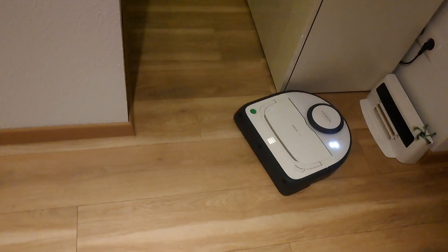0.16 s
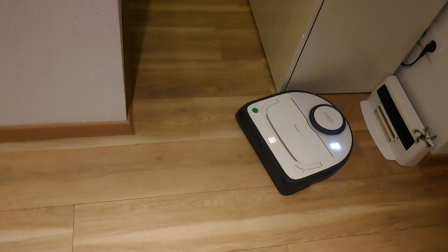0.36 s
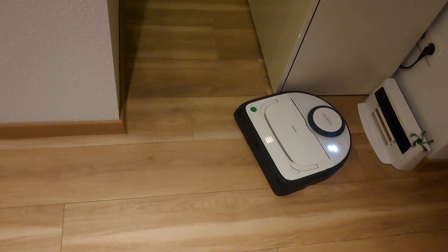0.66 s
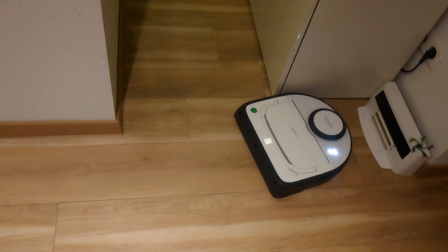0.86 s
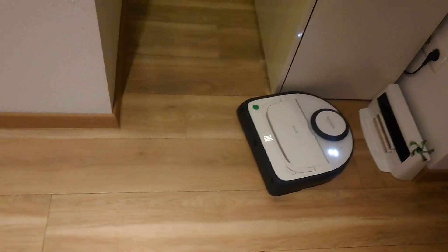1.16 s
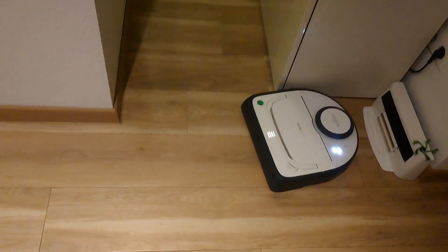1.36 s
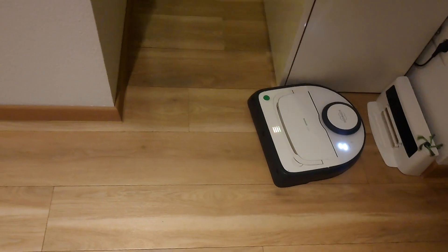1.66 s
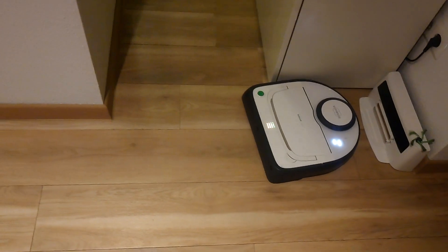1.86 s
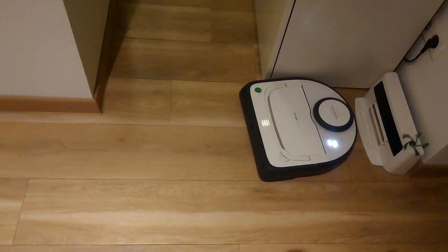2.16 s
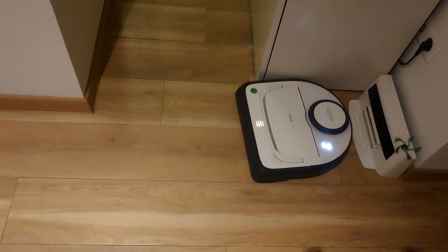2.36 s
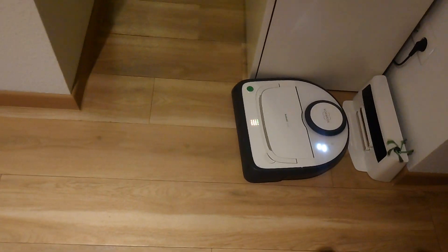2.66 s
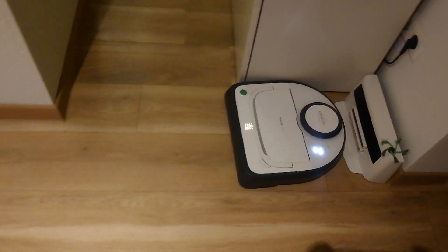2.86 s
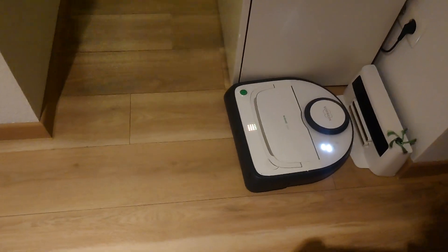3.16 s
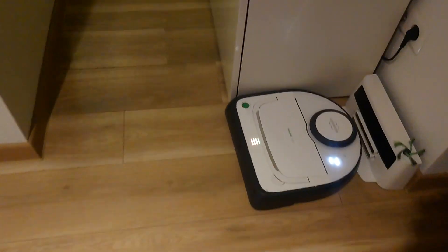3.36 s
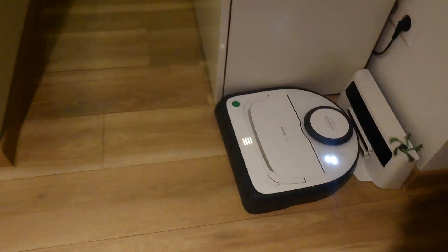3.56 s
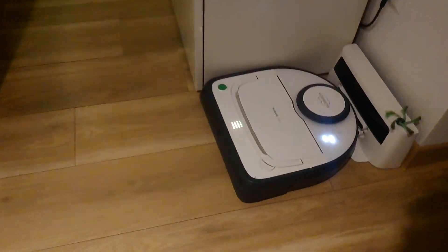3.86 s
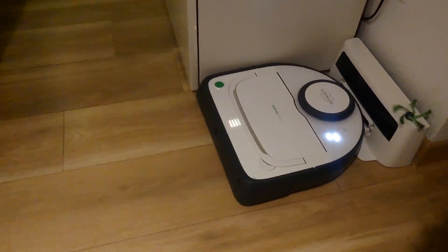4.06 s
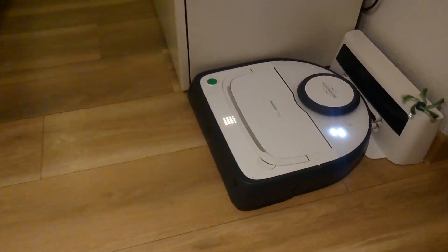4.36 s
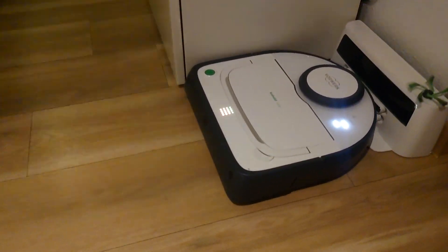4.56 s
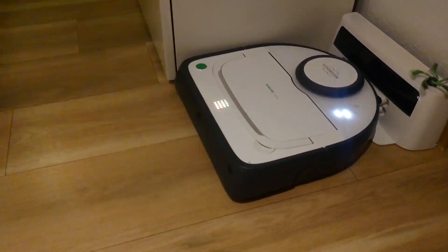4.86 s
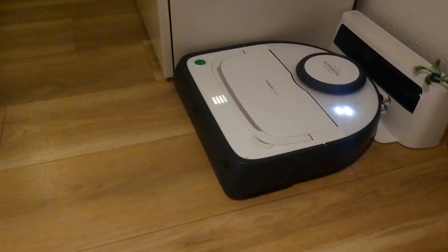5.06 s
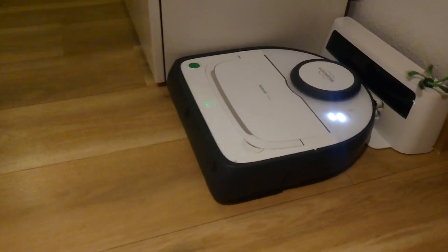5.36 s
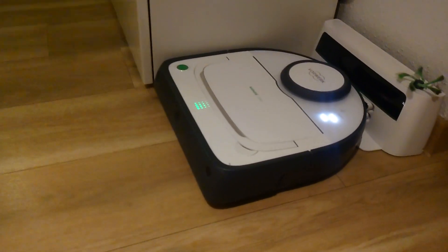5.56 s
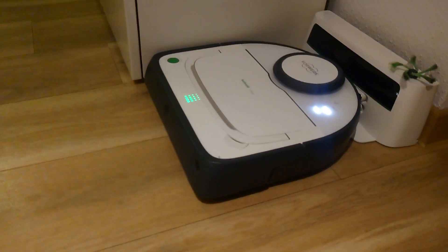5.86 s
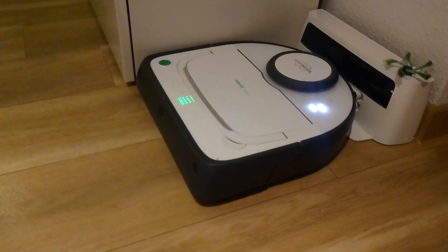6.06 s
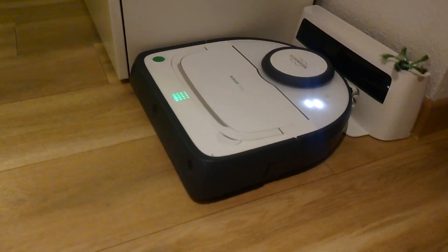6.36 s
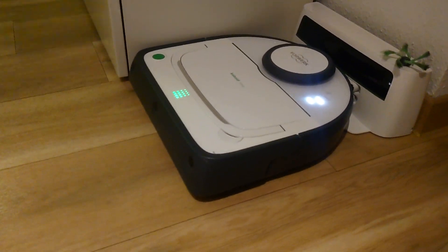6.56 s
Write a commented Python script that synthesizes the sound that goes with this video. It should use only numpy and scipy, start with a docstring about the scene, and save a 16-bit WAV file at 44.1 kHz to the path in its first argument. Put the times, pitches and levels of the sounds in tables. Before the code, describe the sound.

A robot vacuum hums steadily with a mid-pitched motor tone and airy brush whirr, then plastic clacks rattle as it settles against its dock.

```python
"""A robot vacuum cleaner backs onto its dock on a wooden floor as a hand-held two-port microphone comes closer.
From the start a small motor sings on multiples of its shaft speed (sines) over a brush whirr (shaped noise),
slower motors hum below, and cloth rustles; from about 1.1 s there are soft thuds and bright ticks.
Near 3 s the loudest tone sinks in a null; then whine and floor drone come up as the microphone nears.
From 3.9 s the dock contacts clack on ringing plastic modes, thickest between 5.4 and 6 s, with a room tail."""
import sys
import numpy as np
from scipy import signal
from scipy.fft import rfft, irfft
from scipy.io import wavfile
from scipy.ndimage import map_coordinates

SR = 44100
rng = np.random.default_rng(int(sys.argv[2]) if len(sys.argv) > 2 else 0)


def to_wav(sig):
    """Store sig (one row per channel, or 1-D mono) as 16-bit WAV at the path in sys.argv[1].

    Samples outside -1..1 are clipped; the rate is SR.
    """
    pcm = np.clip(np.atleast_2d(sig), -1, 1) * 32767
    pcm = np.round(pcm).astype(np.int16)
    wavfile.write(sys.argv[1], SR, pcm.T)  # frames by channels


N = 296333
TIME = np.arange(N) / SR
FREQ = np.fft.rfftfreq(N, 1 / SR) + 1   # shifted up 1 Hz so that its logarithm exists


def amp(db):
    """Decibels to gain."""
    return 10 ** (np.asarray(db) / 20)


def rms_one(x):
    """Scale to rms 1."""
    return x / np.sqrt(np.mean(x ** 2) + 1e-20)


def in_time(rows):
    """Columns of a table, joined by straight lines in time."""
    s, *columns = np.transpose(rows)
    return [np.interp(TIME, s, column) for column in columns]


def at_hz(points):
    """A spectrum in dB, or another value per frequency, joined on a log-frequency axis."""
    hz, value = np.transpose(points)
    return np.interp(np.log(FREQ), np.log(hz), value)


def drift(rate_hz):
    """Slow chance of spread 1: coarse noise through a double one-pole low-pass."""
    step = 64   # one coarse value every 64 samples
    r = np.exp(-2 * np.pi * rate_hz * step / SR)
    noise = rng.standard_normal(N // step + 2002)
    slow = signal.lfilter([1], [1, -2 * r, r * r], noise)[2000:]   # drop the filter's start
    return np.interp(np.arange(N) / step, np.arange(len(slow)), rms_one(slow))


def tone(turns, left_db, right_db, lead):
    """A sine at both ports, given in rms dB, the left leading by an angle in radians."""
    start = rng.uniform(0, 2 * np.pi)
    phase = 2 * np.pi * turns + start
    left = amp(left_db) * np.sin(phase + lead / 2)
    right = amp(right_db) * np.sin(phase - lead / 2)
    return np.sqrt(2) * np.array([left, right])


def band_filter(x, order, hz, kind):
    """Butterworth filter that keeps the highs or a band."""
    return signal.sosfilt(signal.butter(order, hz, kind, fs=SR, output="sos"), x)


# Resonances of the shell. Each row: pitch in Hz, width in Hz, boost or cut in dB.
SHELL_RESONANCES = [(515, 156, -5), (1966, 30, -2), (3335, 170, 4.5), (4063, 270, -7), (6000, 270, 2.5),
                    (8400, 340, 4), (9250, 100, 4.5), (10100, 340, 3.5), (11900, 700, -1.5),
                    (13600, 430, -5.5), (16100, 230, -7)]
# How alike the noise is left and right. Each row: frequency in Hz, likeness from 0 to 1.
PORT_LIKENESS = [(60, 0.34), (130, 0.8), (290, 0.63), (640, 0.93), (1410, 0.041), (3100, 0.12),
                 (6820, 0.027), (15000, 0.005)]


def air(spectrum, source=None):
    """Stereo noise with a spectrum, the shell resonances and the ports' likeness; rms 1."""
    peaks_db = sum(db / (1 + ((FREQ - hz) / (width / 2)) ** 2) for hz, width, db in SHELL_RESONANCES)
    if source is None:
        source = rng.standard_normal((2, N))
    mid, side = rfft(source) * amp(at_hz(spectrum) + peaks_db)
    alike = np.clip(at_hz(PORT_LIKENESS), 0, 1)
    # the shared part is equal at both ports, the other part is opposite
    return rms_one(irfft(np.sqrt(1 + alike) * mid + np.sqrt(1 - alike) * side * [[1], [-1]], N))


def scraping(turns, share, memory_turns):
    """Motor brushes meet the same slowly renewed roughness every turn, so multiples show faint lines."""
    steps = 512   # roughness values per turn
    keep = np.exp(-1 / memory_turns)
    fresh = rng.standard_normal((2, int(turns[-1]) + 101, steps))
    pattern = signal.lfilter([1], [1, -keep], fresh, axis=1)[:, 100:].reshape(2, -1)
    repeating = rms_one(pattern[:, (turns * steps).astype(int)])
    return np.sqrt(share) * repeating + np.sqrt(1 - share) * rng.standard_normal((2, N))


def patchy(x, depth_db, band_hz, hold_s):
    """Narrow bands swell and fade on their own as the microphone moves through the sound field."""
    hz, s, cells = signal.stft(x, SR, nperseg=1024)
    chance = rng.standard_normal((2, int(hz[-1] / band_hz) + 2, int(s[-1] / hold_s) + 2))
    grid = np.meshgrid(hz / band_hz, s / hold_s, indexing="ij")
    gain = amp(depth_db * np.array([map_coordinates(c, grid, order=1) for c in chance]))
    return rms_one(signal.istft(cells * gain, SR, nperseg=1024)[1][:, :N])


# Shaft speed. Each row: time in seconds, turns per second.
SHAFT_SPEED = [(0.0, 95.38), (0.7, 95.41), (1.0, 95.21), (2.25, 95.09), (2.75, 95.26), (3.0, 95.46),
               (3.35, 95.36), (4.3, 95.56), (5.05, 95.95), (5.4, 95.8), (5.9, 95.43), (6.72, 95.57)]


def shaft_turns():
    """Turns made by the shaft so far; its angle flutters a little."""
    return np.cumsum(in_time(SHAFT_SPEED)[0]) / SR + .0015 * drift(5.3)


# Motor whine, which grows as the microphone nears. Each row: time in seconds, level in dB.
WHINE_LEVEL = [(0, -71.5), (2.5, -73.5), (3.5, -64), (4.3, -67), (4.8, -56.5), (5.4, -54.5), (6.0, -55.5),
               (6.72, -58)]
FAR_DB = -68   # the whine level at which the other growing sounds have their base levels


def nearness():
    """How many dB the whine stands above its far level."""
    return in_time(WHINE_LEVEL)[0] - FAR_DB


# The loudest multiple, the fifth; the microphone crosses a null of its standing wave.
# Each row: time in seconds, level in dB, left minus right in dB, left lead in radians.
FIFTH_MULTIPLE = [(0.0, -43, -5.5, -0.69), (0.45, -43, -5.5, -0.57), (2.0, -44.5, -4, -0.72),
                  (2.47, -49.5, 1.5, -0.53), (2.82, -54.5, -0.5, -1.1), (2.99, -57, -8, -1),
                  (3.18, -56, -10.5, -0.4), (3.54, -45.5, -5.5, 0.2), (3.99, -42.5, -3.5, -0.32),
                  (4.94, -39, -5.5, -0.4), (5.54, -39.5, -4.5, -0.26), (5.69, -38.5, -5, -0.17),
                  (6.72, -38.5, -5, -0.29)]
# Strong multiples of the shaft speed.
STRONG_MULTIPLES = [10, 12, 15, 21, 22]
# They swell and sink as the microphone crosses their standing waves.
# Each row: time in seconds, then the level of each strong multiple in dB, at the left and right port.
STRONG_LEFT_DB = [(0.0, -64, -71, -76.0, -68, -74.0), (0.28, -64, -80.0, -66.0, -67, -80),
                  (0.56, -63, -89, -63.0, -66, -65), (0.84, -76, -75, -73.0, -62, -60),
                  (1.12, -78, -65, -64, -69, -63.0), (1.4, -69, -77.0, -61, -61, -79),
                  (1.68, -71.0, -72.0, -61, -74, -59), (1.96, -74.0, -72.0, -63, -61, -60),
                  (2.24, -70, -67.0, -75, -68, -62.5), (2.52, -70.0, -64, -67, -78, -66),
                  (2.8, -70.0, -64, -69, -80, -73.0), (3.08, -66, -69, -72, -70, -58),
                  (3.36, -71.0, -79, -71, -63, -67), (3.64, -65, -57, -67.0, -63, -60),
                  (3.92, -58.5, -75, -66, -61.0, -60), (4.2, -67, -64, -64, -64.0, -66.0),
                  (4.48, -82, -65, -57, -70, -66), (4.76, -71.0, -70, -67, -60, -71),
                  (5.04, -90.0, -74, -60, -78, -71), (5.32, -82, -70, -59.0, -63.0, -75.0),
                  (5.6, -64, -69, -61, -56, -60), (5.88, -66, -79, -62, -60, -64),
                  (6.16, -68, -62, -67.0, -60, -56), (6.44, -63, -67, -68, -62, -58.5),
                  (6.72, -66.0, -66, -67.0, -66, -55)]
STRONG_RIGHT_DB = [(0.0, -75.0, -60.0, -66.0, -66.0, -63.0), (0.28, -85.0, -60.0, -70.0, -68.0, -66.0),
                   (0.56, -80.0, -60.0, -65.0, -69.0, -67.0), (0.84, -75.0, -61.0, -64.0, -63.0, -58.0),
                   (1.12, -83.0, -63.0, -67.0, -64.0, -58.0), (1.4, -74.0, -65.0, -65.0, -61.0, -61.0),
                   (1.68, -72.0, -62.0, -65.0, -63.0, -62.0), (1.96, -65.0, -64.0, -65.0, -59.0, -62.0),
                   (2.24, -66.0, -66.0, -73.0, -62.0, -65.0), (2.52, -72.0, -71.0, -67.0, -60.0, -65.0),
                   (2.8, -71.0, -64.0, -61.0, -61.0, -65.0), (3.08, -69.0, -67.0, -61.0, -62.0, -70.0),
                   (3.36, -64.0, -68.0, -62.0, -67.0, -62.0), (3.64, -66.0, -64.0, -68.0, -63.0, -61.0),
                   (3.92, -63.0, -65.0, -60.0, -62.0, -63.0), (4.2, -68.0, -65.0, -62.0, -62.0, -66.0),
                   (4.48, -77.0, -68.0, -62.0, -61.0, -65.0), (4.76, -80.0, -74.0, -65.0, -64.0, -61.0),
                   (5.04, -74.0, -72.0, -61.0, -67.0, -65.0), (5.32, -81.0, -74.0, -61.0, -67.0, -65.0),
                   (5.6, -76.0, -76.0, -66.0, -58.0, -56.0), (5.88, -74.0, -71.0, -65.0, -62.0, -57.0),
                   (6.16, -70.0, -70.0, -65.0, -66.0, -56.0), (6.44, -75.0, -77.0, -69.0, -75.0, -61.0),
                   (6.72, -73.0, -92.0, -67.0, -70.0, -59.0)]
# Each row: time in seconds, then the left lead of each strong multiple in radians.
STRONG_LEFT_LEAD = [(0.0, 0.2, 0.1, 0.0, -0.0, -0.1), (0.28, 1.2, 2.0, 1.6, 0.9, -2.6),
                    (0.56, 3.7, 3.6, 1.5, 1.2, -1.5), (0.84, 2.4, 3.5, 1.6, 0.6, -0.6),
                    (1.12, 4.7, 3.7, -0.5, -0.2, -1.0), (1.4, 4.7, 3.6, -2.7, -0.5, -0.6),
                    (1.68, 4.4, 3.6, -2.7, -0.8, -0.5), (1.96, 5.2, 3.7, -3.3, -0.1, -0.1),
                    (2.24, 5.9, 3.9, -4.3, -1.1, 0.3), (2.52, 6.2, 4.1, -1.5, -1.0, 0.4),
                    (2.8, 6.2, 4.1, -0.2, -1.4, 1.7), (3.08, 5.8, 4.9, 0.8, -0.2, -0.6),
                    (3.36, 6.3, 6.3, 0.1, -0.5, 0.1), (3.64, 6.5, 6.2, -2.8, -0.2, 1.2),
                    (3.92, 6.2, 5.9, -4.2, 0.3, 0.9), (4.2, 6.1, 7.3, -4.3, -0.1, 0.4),
                    (4.48, 6.4, 7.8, -4.3, 0.6, 0.4), (4.76, 5.1, 8.7, -5.4, 0.5, 2.0),
                    (5.04, 4.9, 6.7, -4.7, 0.6, 1.5), (5.32, 6.0, 6.9, -4.6, 0.9, 1.5),
                    (5.6, 6.3, 6.9, -4.4, 0.3, 1.7), (5.88, 6.9, 6.8, -4.1, -0.0, 2.3),
                    (6.16, 6.7, 5.8, -3.6, 0.0, 2.6), (6.44, 6.3, 5.4, -3.6, -0.4, 1.8),
                    (6.72, 6.1, 4.7, -3.5, -0.8, 2.4)]
# Multiples inside the whine band.
WHINING_MULTIPLES = [35, 39, 42, 44]
# Each row: time in seconds, then the level of each whining multiple in dB.
WHINING_DB = [(0.0, -69, -69, -74, -74), (0.28, -71, -72, -83, -70.0), (0.56, -70, -88, -68.5, -72.0),
              (0.84, -69, -74, -71, -68), (1.12, -78.0, -73, -73, -67), (1.4, -82, -81, -66.5, -74),
              (1.68, -79, -75.0, -77, -66), (1.96, -74.0, -67, -70, -69), (2.24, -73, -79, -66, -69),
              (2.52, -75.0, -61, -70, -63), (2.8, -86.0, -73.0, -63.5, -79), (3.08, -71, -71, -63, -77),
              (3.36, -74, -67, -69.0, -67), (3.64, -84, -64, -67.0, -70), (3.92, -76, -75, -68, -72),
              (4.2, -68, -73.0, -71, -70), (4.48, -75, -70, -67, -68), (4.76, -68, -64, -68, -70),
              (5.04, -63.0, -66, -66, -72.0), (5.32, -63, -65.0, -64, -71), (5.6, -68, -68.0, -71, -76),
              (5.88, -61, -67, -67, -81), (6.16, -62, -70, -68, -73), (6.44, -64.0, -69, -66, -71),
              (6.72, -58, -74, -67, -73)]
# Weak multiples. Each row: multiple of the shaft speed, base level in dB.
WEAK_MULTIPLES = [(1, -82.5), (8, -76.5), (9, -75), (11, -80), (13, -75), (14, -75), (16, -75.5), (17, -75),
                  (19, -74.5), (20, -72), (23, -75), (26, -76.5), (34, -75), (40, -75), (41, -73),
                  (57, -82), (64, -82.5), (66, -84)]
LINES_GROW = 0.26   # dB per dB of the whine


def motor(turns, near_db):
    """Sines locked to the shaft; each multiple fades and shifts on its own."""
    tone_db, pan_db, lead = in_time(FIFTH_MULTIPLE)
    tone_db = tone_db + .5 * drift(17.5)
    out = tone(5 * turns + 0.0037 * drift(25), tone_db + pan_db / 2, tone_db - pan_db / 2, lead)

    strong = zip(STRONG_MULTIPLES, in_time(STRONG_LEFT_DB), in_time(STRONG_RIGHT_DB),
                 in_time(STRONG_LEFT_LEAD))
    for multiple, left_db, right_db, lead in strong:
        waver_db = 2.13 * drift(6.4)
        cycles = multiple * turns + 0.012 * drift(11.0)
        out += tone(cycles, left_db + waver_db, right_db + waver_db, lead)

    for multiple, db in zip(WHINING_MULTIPLES, in_time(WHINING_DB)):
        cycles = multiple * turns + .55 * drift(9.0)
        out += tone(cycles, db + 4.0 * drift(9.0), db + 4.0 * drift(9.0), 1.5 * drift(.8))

    for multiple, db in WEAK_MULTIPLES:
        high = multiple > 30
        # higher lines warble more; the highest come in short patches
        fades_hz = 9 if high else 3.5
        cycles = multiple * turns + .009 * multiple * drift(8.8)
        # the shaft rate and the high multiples grow as the microphone nears
        db = db + LINES_GROW * near_db * (high or multiple == 1)
        left_db, right_db = db + 4.5 * drift(fades_hz), db + 4.5 * drift(fades_hz)
        out += tone(cycles, left_db, right_db, rng.uniform(-3, 3))
    return out


# Slower motors. Each row: time in seconds, left level of the lower tone in dB, of the upper tone in dB.
HUM_LEVELS = [(0.0, -68, -71.5), (1.1, -66, -67), (2.4, -64, -65), (3.55, -64.5, -67.5), (4.25, -66.5, -80),
              (4.85, -66.5, -73), (5.7, -66, -71), (6.72, -70.5, -76)]
HUM_HZ = (242.9, 322.4)
HUM_WAVER_DB = 2.5


def hum():
    """Two low tones of slower motors; their level wavers."""
    low_db, high_db = in_time(HUM_LEVELS) + HUM_WAVER_DB * np.array([drift(7.1), drift(1.0)])
    low = tone(HUM_HZ[0] * TIME, low_db, low_db + 1.5, 0.11)
    high = tone(HUM_HZ[1] * TIME, high_db, high_db + 3.5, 0.17)
    return low + high


# Tone colours of the four noises. Each row: frequency in Hz, relative level in dB.
LOW_WHIRR_SPECTRUM = [(100, -34), (170, -29), (237, -12), (414, -13), (472, -11.5), (507, -14.5),
                      (531, -3.5), (666, -15.5), (1140, -17.5), (1620, -12), (2060, -14.5), (2290, -16.5),
                      (2900, -24.5), (3770, -65), (6380, -120)]
HIGH_WHIRR_SPECTRUM = [(1470, -32), (2500, -20), (2610, -20), (2800, -8), (3230, -1), (3550, -4.5),
                       (4140, 0.5), (5170, -8.5), (6140, -16), (6980, -23), (7200, -20.5), (9360, -22),
                       (15800, -120)]
HISS_SPECTRUM = [(3760, -38), (6400, 1.5), (7020, -19), (7750, 2.5), (8660, -6.5), (9000, 0), (10200, 2),
                 (11800, -1), (13400, 3), (15100, 0), (15700, -5), (16200, -19)]
RUMBLE_SPECTRUM = [(12, -33), (20, -13), (54, -5.5), (87, -14), (114, -9), (210, 2), (228, -36), (240, 3),
                   (310, -51), (530, -120)]
# base levels in dB, then growth in dB per dB of the whine
LOW_DB, HIGH_DB, HISS_DB, RUMBLE_DB = -57.5, -57.5, -67, -71
LOW_GROWS, HIGH_GROWS, HISS_GROWS, RUMBLE_GROWS = 0.011, 0.16, 0.067, 0.027


def whirr(turns, near_db):
    """Low noise and rumble lie under brush noise and hiss that throb once and twice a turn."""
    throb = 1 + 0.1 * np.sin(2 * np.pi * turns) + 0.091 * np.sin(4 * np.pi * turns)
    low = patchy(air(LOW_WHIRR_SPECTRUM), 2.4, 150, 0.33)
    low = amp(LOW_DB + LOW_GROWS * near_db + 1.0 * drift(13.0)) * low

    brushes = scraping(turns, share=0.31, memory_turns=4.5)
    high = patchy(air(HIGH_WHIRR_SPECTRUM, brushes), 2.6, 200, .18)
    high = amp(HIGH_DB + HIGH_GROWS * near_db + 1.2 * drift(12.0)) * throb * high

    brushes = scraping(turns, share=0.59, memory_turns=8.0)
    hiss = patchy(air(HISS_SPECTRUM, brushes), 2.6, 350, .4)
    hiss = amp(HISS_DB + HISS_GROWS * near_db + 1.0 * drift(14)) * throb * hiss

    rumble = amp(RUMBLE_DB + RUMBLE_GROWS * near_db + 2.0 * drift(2.0)) * air(RUMBLE_SPECTRUM)
    return low + high + hiss + rumble


# Tone colour of the whine. Each row: frequency in Hz, relative level in dB.
WHINE_SPECTRUM = [(2700, -21), (3050, -13), (3300, -0.5), (3520, -13), (3750, 3.5), (4050, 6.5),
                  (4300, -40), (5000, -38)]
DRONE_DB, DRONE_GROWS = -80.5, 0.83   # base level, dB per dB of the whine


def close_by(turns, near_db):
    """A narrow band of motor whine and a drone of the floor boards come up as the microphone nears."""
    brushes = scraping(turns, share=0.64, memory_turns=4.0)
    whine = patchy(air(WHINE_SPECTRUM, brushes), 2.5, 180, .07)
    drone = rms_one(band_filter(rng.standard_normal((2, N)), 2, [90, 160], "band"))
    return amp(FAR_DB + near_db) * whine + amp(DRONE_DB + DRONE_GROWS * near_db) * drone


# Narrow airy bands that come and go close to the outlet.
# Each row: start in seconds, end in seconds, pitch in Hz, width in Hz, level in dB.
AIRY_BANDS = [(4.25, 4.6, 13000, 500, -78), (4.9, 6.35, 13350, 300, -77), (5.0, 5.4, 10700, 200, -79),
              (5.6, 6.8, 11000, 200, -78), (5.6, 6.8, 8100, 400, -75), (4.95, 5.8, 15500, 250, -78),
              (3.0, 4.8, 10100, 400, -77), (-1, 4.9, 9250, 110, -81)]
AIRY_FADE_S = .15   # before the start and after the end


def airy():
    """Noise through narrow resonances that fade in and out."""
    out = np.zeros((2, N))
    white = rfft(rng.standard_normal((2, N)))
    for start, end, hz, width, db in AIRY_BANDS:
        band = rms_one(irfft(white / (1 + ((FREQ - hz) / (width / 2)) ** 2), N))
        fade = np.interp(TIME, [start - AIRY_FADE_S, start, end, end + AIRY_FADE_S], [0, 1, 1, 0])
        out += amp(db + 1.5 * drift(3.3)) * fade * band
    return out


# Cloth near the microphone. Each row: start in seconds, rise in seconds,
# fall in seconds (half of it halves the swish), level in dB.
CLOTH_RUSTLES = [(0.0, 0.029, 0.15, -53.5), (1.51, 0.055, 0.1, -52.5), (2.37, 0.024, .04, -60),
                 (3.22, 0.035, 0.045, -56.5), (3.34, 0.04, .05, -62), (3.86, 0.025, 0.05, -56),
                 (4.74, .09, 0.1, -61), (5.47, .025, 0.05, -58), (5.6, 0.007, 0.045, -58)]


def rustles():
    """Bright, uneven swishes that rise smoothly and die away softly."""
    shape = np.zeros(N)
    for start, rise, fall, db in CLOTH_RUSTLES:
        after = np.clip(TIME - start - rise, 0, None)
        swell = np.sin(np.pi / 2 * np.interp(TIME, [start, start + rise], [0, 1])) ** 2
        shape += amp(db) * swell / (1 + (2 * after / fall) ** 3)
    colour = [(3000, -6), (6500, -3.5), (9000, 2), (12000, 0.0), (16000, 1.5)]   # Hz, relative dB
    swish = patchy(air(colour), 2.5, 1500, .03)
    return shape * amp(1.8 * drift(66)) * swish


# Soft steps. Each row: start in seconds, strength in dB, pitch in Hz.
SOFT_STEPS = [(1.131, -46, 169), (4.657, -50, 71), (5.508, -40, 180), (5.711, -50, 91.5), (6.044, -42, 200)]


def thuds():
    """Short low pushes through the floor: quickly damped sines."""
    out = np.zeros(N)
    for s, db, hz in SOFT_STEPS:
        after = np.clip(TIME - s, 0, None)
        out += amp(db) * np.sin(2 * np.pi * hz * after) * (after / 0.0037) * np.exp(-after / 0.005)
    return band_filter(out, 1, 60, "high")


# Bright cloth ticks. Each row: start in seconds, strength in dB, duller mid part in dB against it.
CLOTH_TICKS = [(1.1388, -41, -16), (2.3825, -54, -7), (3.8848, -39, -1), (4.1275, -56, -4),
               (4.7117, -57, -5), (4.8254, -35, -8), (4.8614, -37, -5), (4.9102, -54, -4),
               (4.9994, -56, -5), (5.0764, -45, -10), (5.4879, -48, -10), (5.4984, -51, -6),
               (5.5144, -52, -5), (5.6038, -38, -9), (5.9189, -53, -4), (5.927, -53, -7), (6.2891, -57, -3)]
TICK_LEFT_DB = -7   # ticks happen at the right port


def ticks():
    """A few milliseconds of bright noise with a duller mid part."""
    bright, middle, n = np.zeros(N), np.zeros(N), np.arange(400)
    for s, db, mid_db in CLOTH_TICKS:
        i = round(s * SR)
        puff = rng.standard_normal(400) * np.exp(-n / SR / .0014)
        bright[i:i + 400] += amp(db) * puff
        middle[i:i + 400] += amp(db + mid_db) * puff
    return band_filter(bright, 2, 6500, "high") + band_filter(middle, 2, [1500, 5500], "band")


def ring(clicks, hz, t60):
    """Clicks set a mode ringing; it falls 60 dB in t60 seconds."""
    r, w = amp(-60 / (t60 * SR)), 2 * np.pi * hz / SR
    return signal.lfilter([0, np.sin(w)], [1, -2 * r * np.cos(w), r * r], clicks + 1e-18)


# Dock contacts. Each row: time in seconds, strength in dB, pitch in Hz of the modes struck hardest.
DOCK_CONTACTS = [(3.887, -39, 1100), (3.888, -38, 4100), (4.127, -44, 2200), (4.583, -37, 2400),
                 (4.712, -42, 1900), (4.818, -40, 1100), (4.829, -39, 1300), (4.838, -38, 1600),
                 (4.846, -41, 750), (5.04, -47, 1300), (5.074, -34, 1300), (5.086, -42, 1500),
                 (5.0995, -36, 1700), (5.108, -40, 2200), (5.301, -35, 1200), (5.314, -42, 1000),
                 (5.4305, -29.5, 2200), (5.4444, -34, 2200), (5.449, -26.5, 3200), (5.459, -39, 3300),
                 (5.4754, -38, 1900), (5.468, -40, 750), (5.4879, -40, 2600), (5.4984, -38, 2200),
                 (5.514, -39, 1900), (5.519, -39, 1200), (5.603, -39, 720), (5.535, -41, 2000),
                 (5.549, -40, 2100), (5.605, -39, 3800), (5.6248, -36, 900), (5.637, -41, 950),
                 (5.8696, -39, 1500), (5.9195, -30.5, 1800), (5.9274, -31, 2200), (5.938, -27, 2500),
                 (5.9474, -35, 2600), (5.955, -39, 2200), (5.963, -38, 1700), (5.97, -40, 2200),
                 (5.978, -40, 1900), (5.984, -41, 2000), (5.995, -45, 1200), (6.007, -42, 2000),
                 (6.0169, -39, 1900), (6.085, -46, 3300)]
# Modes of the plastic case. Each row: pitch in Hz, relative level in dB, seconds to fall 60 dB.
CASE_MODES = [(454, 2, 0.018), (740, -7, 0.028), (900, -7, 0.028), (1200, -11, 0.02), (1700, -3, 0.013),
              (2200, -7, 0.009), (2950, -2, 0.0062), (3344, 0, 0.012), (4140, -1, 0.005), (5000, 0, 0.0046),
              (6100, -1, 0.0035)]
RATTLE_DB, RATTLE_S, RATTLES_PER_S = -20, .035, 500   # loose parts chatter on after each contact
# softer contacts strike fewer modes: dB per octave, added per dB below the limit
FOCUS_DB_PER_OCT, SOFT_BELOW_DB, SOFT_FOCUS = 7, -33, 1.0
CLACK_LEFT_LEAD_S = .00009


def clacks():
    """Each contact strikes, rebounds once and rattles on every case mode, hardest near its own pitch."""
    s, strike_db, centre_hz = np.transpose(DOCK_CONTACTS)
    luck_db = rng.normal(0, 1.5, (len(s), len(CASE_MODES)))
    at = np.round(s * SR).astype(int)
    after = np.arange(int(.12 * SR)) / SR
    size = (len(s), len(after))
    # sparse random clicks that die away
    chatter = rng.standard_normal(size) * (rng.random(size) < RATTLES_PER_S / SR)
    hits = amp(RATTLE_DB) * np.exp(-after / RATTLE_S) * chatter
    hits[:, 0] = 1                                  # the strike
    hits[:, round(.0024 * SR)] = -amp(-6.0)         # the rebound
    focus = FOCUS_DB_PER_OCT + SOFT_FOCUS * np.clip(SOFT_BELOW_DB - strike_db, 0, 6)
    out = np.zeros(N)
    for k, (hz, db, t60) in enumerate(CASE_MODES):
        clicks = np.zeros(N)
        octaves_off = np.abs(np.log2(hz / centre_hz))
        # neighbouring modes start in opposite directions
        strength = amp(strike_db + db - focus * octaves_off + luck_db[:, k]) * (-1) ** k
        np.add.at(clicks, at[:, None] + np.arange(len(after)), strength[:, None] * hits)
        out += ring(clicks, hz, t60)
    return band_filter(out, 2, [450, 7000], "band")


ROOM_T60_S, ROOM_DB = .24, -8   # seconds to fall 60 dB, tail level


def room(x):
    """A decaying noise tail, different at each port."""
    n = np.arange(int(.5 * SR))
    decay = amp(-60 * n / SR / ROOM_T60_S) * (n > .003 * SR)   # silent for the first 3 ms
    tail = rng.standard_normal((2, len(n))) * decay
    return signal.fftconvolve(x[None], rms_one(tail) / np.sqrt(len(n)), axes=1)[:, :N]


def scene():
    """Machine, cloth, steps, contacts and the room tail."""
    turns, near_db = shaft_turns(), nearness()
    machine = motor(turns, near_db) + hum() + whirr(turns, near_db) + close_by(turns, near_db) + airy()
    cloth, steps = rustles(), thuds()
    tick, clack = ticks(), clacks()
    both_ticks = tick * amp([[TICK_LEFT_DB], [0]])
    both_clacks = np.array([np.roll(clack, -round(CLACK_LEFT_LEAD_S * SR)), clack])
    tail = amp(ROOM_DB) * room(clack + .3 * tick)
    return machine + cloth + steps + both_ticks + both_clacks + tail


# The muffled left port. Each row: frequency in Hz, gain in dB.
LEFT_PORT_GAIN = [(60, 2.5), (200, -6.5), (450, 3), (700, -4), (2400, -1.5), (3300, -7), (3900, 0.5),
                  (4600, -3.5), (5300, -28), (7000, -6), (9000, -19.5), (10000, -11.5), (12000, -7.5),
                  (15500, -22)]
CUTOFF_HZ = 15750


def record(dry):
    """The left port is muffled, gain control ducks after peaks, the top is cut."""
    left = irfft(rfft(dry[0]) * amp(at_hz(LEFT_PORT_GAIN)), N)
    ports = np.array([left, dry[1]])
    level_db = 20 * np.log10(np.abs(ports).max(axis=0) + 1e-9)
    over_db = np.maximum(level_db + 18.0, 0)   # how far peaks pass -18 dB
    release = 37.0 * TIME   # lets go at 37 dB per second
    held_db = np.maximum.accumulate(over_db + release) - release
    r = np.exp(-1 / (0.01 * SR))   # smoothed over 10 ms
    ports = ports * amp(-.4 * signal.lfilter([1 - r], [1, -r], held_db))
    return signal.sosfilt(signal.ellip(12, .5, 70, CUTOFF_HZ, fs=SR, output="sos"), ports)


dry = scene()
out = record(dry)
to_wav(out)
```